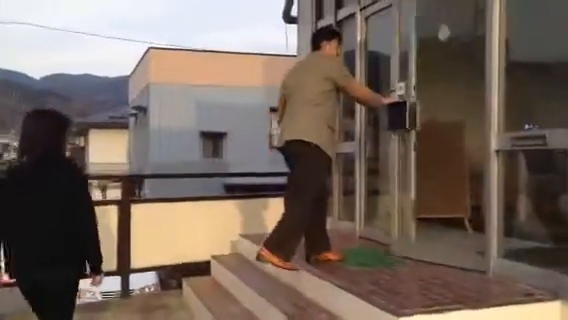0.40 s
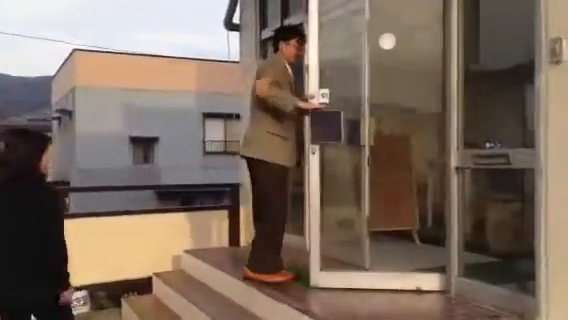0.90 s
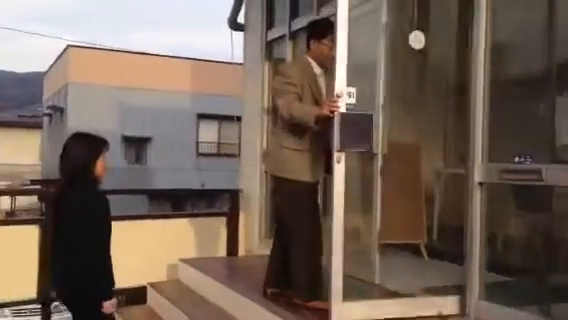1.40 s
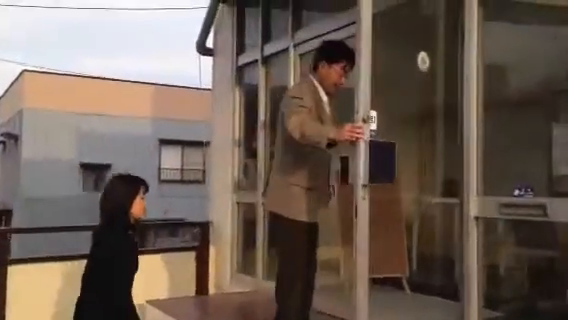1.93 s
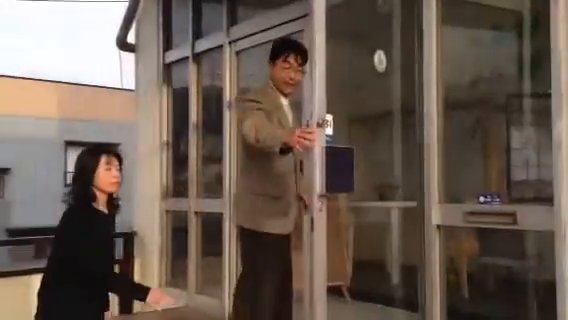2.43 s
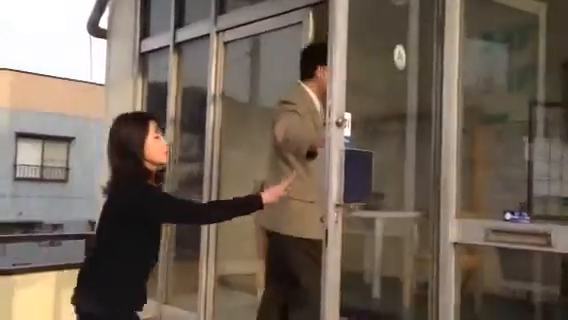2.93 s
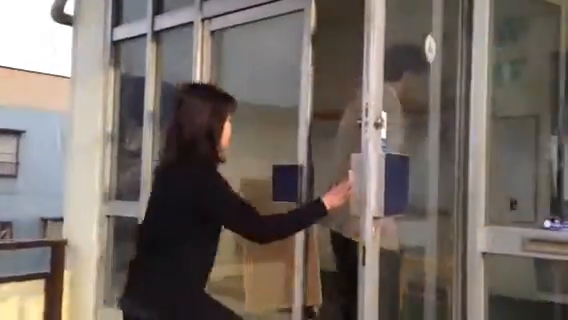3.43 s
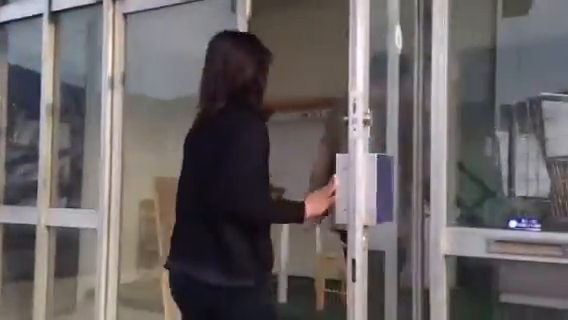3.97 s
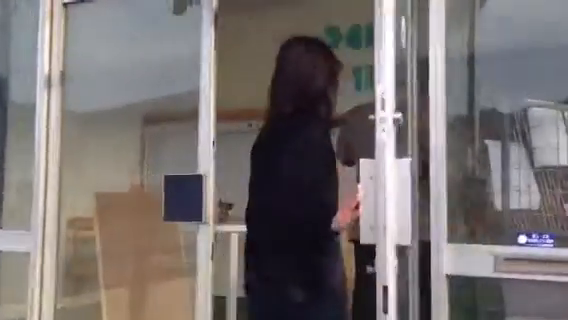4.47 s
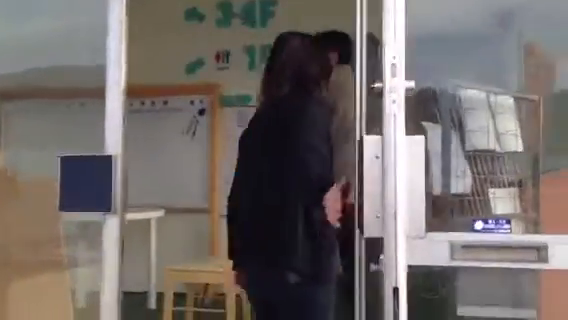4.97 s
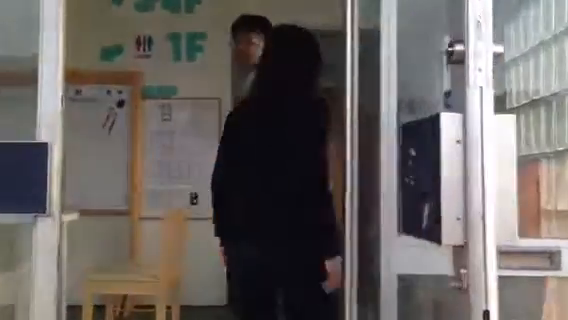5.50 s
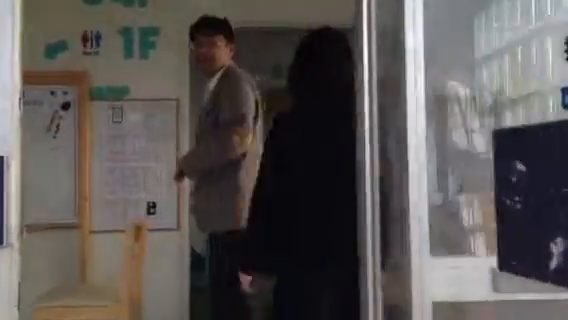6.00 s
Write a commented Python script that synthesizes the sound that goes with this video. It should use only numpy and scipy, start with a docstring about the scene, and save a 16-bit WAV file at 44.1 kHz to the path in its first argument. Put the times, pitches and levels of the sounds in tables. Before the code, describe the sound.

Mono handheld outdoor sound near a glass door: dry metallic snaps and pings of a sticking hinge, each ringing the frame with short porch echoes and a diffuse tail. Soft low wind thumps run beneath. After the door quiets, shoes scuff gently, a sole scrapes hard near the end, and small dry clicks follow, with a quiet far traffic bed throughout.

```python
"""A stiff hinge slips in sharp snaps that ring the metal frame of a glass door at an entrance porch.
Each snap is a noise crack with a gritty rattle, a pin ping and frame modes, with echoes and a diffuse tail.
Shoes step, thud and scrape (shaped noise) and small things tick (short sine swells).
Low-band noise and single thumps make the wind on the microphone, over a bed of coloured town noise."""
import sys
import numpy as np
from scipy import signal
from scipy.fft import rfft, irfft
from scipy.io import wavfile
from scipy.ndimage import uniform_filter1d

SR = 44100
rng = np.random.default_rng(int(sys.argv[2]) if len(sys.argv) > 2 else 0)


def store_pcm(level_fs):
    """Save levels as 16-bit WAV."""
    pcm = np.round(np.clip(level_fs, -1, 1) * 32767).astype(np.int16)
    wavfile.write(sys.argv[1], SR, np.atleast_2d(pcm).T)


def volts(x):
    """Linear amplitude factor 10**(x/20) for a level x in dB, scalar or array-like."""
    e = np.asarray(x, float) / 20
    return 10 ** e


N = 270112

# modes of the door frame: (pitch [Hz], level over the snap's colour [dB], t60 [s])
FRAME_MODES = [(1010, -20, .08), (1175, -10, .25), (1330, -20, .07), (1550, -17, .09), (1880, -13, .15),
               (2065, -14, .2), (2238, -15, .06), (2993, -16, .07), (3248, -16, .1), (3513, -19, .07),
               (3840, -17, .065), (4165, -18, .06), (4470, -16, .055), (4780, -19, .055), (5245, -19, .065),
               (5712, -19, .055), (6260, -20, .1), (6420, -21, .05), (7050, -20, .045), (7300, -19, .045),
               (7760, -21, .04), (8500, -21, .04), (10350, -23, .04)]


def evened(x):
    """Scales to unit rms."""
    return x / np.sqrt(np.mean(x ** 2) + 1e-20)


def read(points, hz):
    """Interpolates (Hz, value) points on a log-frequency axis."""
    f, value = np.transpose(sorted(points))
    return np.interp(np.log(hz + 1), np.log(f + 1), value)


def add(mix, start_s, sound):
    """Adds a sound in place, cut at the end of the mix."""
    part = mix[round(start_s * SR):][:len(sound)]
    part += sound[:len(part)]


def coloured(size, gain):
    """Noise whose spectrum follows gain(hz)."""
    return irfft(rfft(rng.standard_normal(size)) * gain(np.fft.rfftfreq(size, 1 / SR)), size)


def hump(hz, centre_hz, octaves):
    """A bell-shaped band on a log-frequency axis."""
    return np.exp(-0.5 * (np.log2((hz + 1) / centre_hz) / octaves) ** 2)


def town():
    """Far traffic and air: random short-time spectra with faint drifting patches."""
    # spectrum ahead of the bass cut below: (frequency [Hz], level per Hz [dB])
    spectrum = [(18, -36), (30, -19), (86, -5), (233, -18.5), (266, -3.5), (303, -9.5), (394, -11.5),
                (600, -16), (1250, -22.5), (3770, -31), (6050, -37.5), (14800, -43), (16000, -51)]
    frames, hz = N // 256 + 5, np.fft.rfftfreq(1024, 1 / SR)
    real, imag, patches = rng.standard_normal((frames, 513, 3)).T
    patches = uniform_filter1d(patches, size=14, axis=0)
    patches_db = evened(uniform_filter1d(patches, size=14, axis=1))
    bass_cut = (hz / (hz + 193.0))[:, None] ** 2
    z = (real + 1j * imag) * volts(read(spectrum, hz)[:, None] + patches_db) * bass_cut
    noise = signal.istft(z, nperseg=1024, noverlap=768)[1][:N]
    return volts(-57.5) * evened(noise)


def bump(db, hz, cycles):
    """A push and pull or two of low pressure, centred in 4096 samples."""
    turns = np.arange(-2048, 2048) / SR * hz
    swell = np.exp(-0.5 * (np.pi * turns / cycles) ** 2)
    return volts(db) * np.cos(2 * np.pi * (turns + rng.random())) * swell


def wind():
    """Lumpy pressure: two low bands shaken by the same fast eddies, and single eddies thumping the microphone."""
    # steady wind: (time [s], low-band level [dB], high-band level [dB])
    levels = [(0.0, -60, -61.5), (0.43, -67, -62.5), (1.55, -54, -59.5), (1.81, -58.5, -59),
              (2.91, -61, -58.5), (3.1, -56.5, -62), (3.54, -60.5, -62.5), (4.98, -59, -58.5),
              (5.28, -59.5, -62), (6.12, -60, -62.5)]
    # single eddies: (middle [s], envelope peak [dB], pitch [Hz], length [cycles])
    thumps = [(0.471, -48.5, 88, 2.4), (.745, -48.5, 70, 2.5), (.91, -51.5, 108, 5.1), (1.21, -47, 70, 1.9),
              (1.435, -42.5, 110, 2.5), (1.456, -40, 90, 1.6), (1.569, -41, 68.5, 2.1),
              (1.635, -39, 75, 2.1), (1.739, -33, 95, 1.7), (1.756, -34.5, 101, 1.2),
              (1.922, -34, 180, 2.3), (1.941, -40, 190, 4.3), (1.97, -40.5, 159, 3.6),
              (2.05, -42, 150, 2.9), (2.09, -46, 175, 3.2), (2.222, -37, 70, 1.1), (2.61, -47.5, 195, 3.8),
              (2.803, -37.5, 210, 1.5), (2.835, -44, 200, 3.1), (2.903, -35, 120, 1.4),
              (2.945, -38, 73.5, 2.7), (2.953, -37.5, 182, 1.15), (2.995, -40.5, 68.6, 2.1),
              (3.126, -45, 90, 1.9), (3.167, -38.5, 89.5, 1.4), (3.39, -42.5, 75, 1.3),
              (3.50, -48.5, 91, 2.9), (3.688, -44.5, 70, 1.8), (4.331, -43, 76, 1.3),
              (4.649, -44.5, 159, 2), (5.20, -51, 75, 1.8), (5.489, -44, 150, 2.7), (5.67, -51, 91, 1.9),
              (5.93, -47, 74.5, 2.1)]
    time_s, low_db, high_db = np.transpose(levels)
    t = np.arange(N) / SR
    eddies_db = 3.5 * evened(coloured(N, lambda hz: hz < 18))
    low = evened(coloured(N, lambda hz: hump(hz, 70, 0.48)))
    high = evened(coloured(N, lambda hz: hump(hz, 158, 0.62)))
    low = low * volts(np.interp(t, time_s, low_db))
    high = high * volts(np.interp(t, time_s, high_db))
    out = evened(volts(eddies_db)) * (low + high)
    for middle_s, *row in thumps:
        add(out, middle_s - 2048 / SR, bump(*row))
    return out


def tick(db, hz, cycles):
    """A few sine cycles that swell and die at once."""
    t = np.arange(1200) / SR
    u = 4 * t * hz / cycles  # swell peaks at u = 1
    return volts(db) * np.sin(2 * np.pi * hz * t) * u * np.exp(1 - u)


def ticks():
    """Small dry ticks and knocks."""
    # (time [s], peak level [dB], pitch [Hz], length [cycles])
    knocks = [(.0092, -32, 540, 7), (0.0389, -36, 890, 1.1), (.0255, -37, 3200, 5.7), (.40, -48, 965, 11),
              (.85, -41.5, 970, 3.9), (2.097, -45, 4880, 6), (3.349, -37, 7900, 9.5),
              (3.7715, -46.5, 3720, 5), (5.1495, -45.5, 4200, 5), (5.1634, -40, 3940, 5),
              (5.172, -41, 3900, 5.4), (5.1944, -53, 6500, 3.6), (5.2044, -49, 6000, 2.5),
              (5.25, -48, 7500, 4), (5.2708, -37, 2850, 2.1), (5.283, -46, 7000, 3.7),
              (5.34, -55, 5500, 3.8), (5.363, -47, 4000, 5), (5.3932, -34.5, 7100, 2),
              (5.403, -49, 8500, 6), (5.5977, -47, 4360, 4.5), (5.774, -44, 5500, 2.6),
              (5.782, -43.5, 3750, 4.4), (5.8512, -37.5, 3630, 3.2), (5.9052, -48, 5800, 4),
              (6.0247, -50, 5670, 4), (6.0771, -34.5, 5000, 2.4)]
    out = np.zeros(N)
    for start_s, *row in knocks:
        add(out, start_s, tick(*row))
    return out


def step(db, gain, rise_s, t60_s):
    """A gritty burst: noise coloured by gain(hz), made uneven by the grains under the sole."""
    t = np.arange(SR) / SR
    grit = volts(3.0 * evened(coloured(SR, lambda hz: hz < 200)))
    rise = np.minimum(t / rise_s, 1) ** 0.28
    decay = volts(-60 * np.maximum(t - rise_s, 0) / t60_s)
    return volts(db) * evened(evened(coloured(SR, gain)) * grit) * rise * decay


def thuds():
    """Hollow heel blows: noise bursts in a fairly narrow band."""
    # (time [s], level [dB], centre [Hz], t60 [s])
    blows = [(.01, -45, 785, 0.16), (.022, -40, 226, 0.16), (1.913, -45.5, 258, 0.13),
             (3.939, -48.5, 1440, 0.6)]
    out = np.zeros(N)
    for start_s, db, centre_hz, t60_s in blows:
        add(out, start_s, step(db, lambda hz: hump(hz, centre_hz, 0.57), 0.004, t60_s))
    return out


def footsteps():
    """Shoes landing and dragging: broad noise bursts, narrower in octaves when brighter."""
    # (time [s], level [dB], centre [Hz], rise [s], t60 [s])
    scuffs = [(0.0242, -45.5, 1100, .001, .11), (.339, -53, 1740, 0.0028, 0.19),
              (.471, -51, 577, 0.0014, 0.043), (1.879, -47.5, 975, 0.0066, 0.45),
              (2.06, -55, 4300, 0.021, 0.25), (2.868, -59, 6500, 0.027, .19), (3.337, -56, 880, .007, .14),
              (3.51, -64, 4000, .015, .2), (3.94, -54, 2840, .009, .9), (4.10, -64, 4460, .023, .16),
              (4.297, -63, 7540, 0.015, 0.13), (4.437, -57, 3000, .006, .23),
              (4.741, -57, 1770, 0.16, 0.18), (5.131, -61, 4200, .025, .18), (5.162, -49, 3200, .01, 0.41),
              (5.262, -56, 2630, .003, 0.6), (5.445, -50.5, 348, 0.048, .2),
              (5.46, -59.5, 3970, 0.044, 0.16), (6.068, -56, 3160, 0.047, .3)]
    out = np.zeros(N)
    for start_s, db, centre_hz, rise_s, t60_s in scuffs:
        octaves = 1.23 * (1e3 / centre_hz) ** 0.31
        add(out, start_s, step(db, lambda hz: hump(hz, centre_hz, octaves), rise_s, t60_s))
    return out


def whines():
    """Faint whines: noise bursts in very narrow bands."""
    # (time [s], level [dB], centre [Hz], width [octaves], rise [s], t60 [s])
    bands = [(.60, -60.5, 2045, 0.013, 0.11, 0.31), (3.881, -61, 3680, 0.14, .12, 0.58)]
    out = np.zeros(N)
    for start_s, db, centre_hz, octaves, rise_s, t60_s in bands:
        add(out, start_s, step(db, lambda hz: hump(hz, centre_hz, octaves), rise_s, t60_s))
    return out


def snap_colour(crack_db, treble_db, body_db, ping_hz):
    """Spectrum of a snap as (Hz, dB) points; a higher pin ping tilts the body brighter."""
    # dull body of the frame: (frequency [Hz], level over the body level [dB])
    body = [(500, -12), (1100, 0), (2000, 1.5), (2800, 2), (3300, 3.5)]
    # (frequency [Hz], level over the treble level [dB])
    bright = [(8000, 5), (10000, -1), (16000, -11)]
    tilt_db_per_octave = 4.5 * np.tanh(3 * np.log2(ping_hz / 2410))
    colour = [(hz, body_db + db + tilt_db_per_octave * np.log2(hz / 1670.0)) for hz, db in body]
    colour.append((5390, crack_db))
    return colour + [(hz, treble_db + db) for hz, db in bright]


def snap(colour, ping_hz, ping_db):
    """A short crack, the gritty rattle of the pane, the ping of the pin and the fluttering frame modes."""
    t = np.arange(8192) / SR
    noise = coloured(len(t), lambda hz: volts(read(colour, hz)))
    grit_db = 8.1 * evened(coloured(len(t), lambda hz: hz < 400))
    rattle = volts(-11 - 60 * t / 0.051 + grit_db)
    crack = noise * (volts(13.5 - 60 * t / 0.013) + rattle) * (1 - np.exp(-t / 0.00045))

    hz, db, t60_s = np.transpose(FRAME_MODES)[:, :, None]
    uneven_db = 5.5 * rng.standard_normal(hz.shape)
    turn = rng.random(hz.shape)
    flutter = rng.standard_normal((len(hz), len(t)))
    flutter = 0.8 + 0.46 * evened(uniform_filter1d(flutter, size=150, axis=1))
    decay = volts(db + read(colour, hz) + uneven_db - 60 * t / t60_s)
    modes = decay * flutter * np.sin(2 * np.pi * (hz * t + turn))

    linger = volts(-20.5 - 60 * t * ping_hz / 450)  # longer for lower pings
    ping = volts(ping_db) * (volts(-60 * t / 0.024) + linger) * np.sin(2 * np.pi * ping_hz * t)
    return crack + (modes.sum(0) + ping) * (1 - np.exp(-t / 0.00023))


def porch(x):
    """The direct sound and its early echoes off pane, floor and wall."""
    # (delay [s], level [dB])
    echoes = [(.0029, -5), (.0066, -10.5), (0.0098, -13), (0.0217, -18.5)]
    early = signal.unit_impulse(2048)
    for delay_s, db in echoes:
        add(early, delay_s, volts(np.array([db])))
    return signal.fftconvolve(x, early)[:N]


def scatter(colour):
    """Diffuse reply of the porch and the hall behind: keeps the colour of the frame modes, dies band by band."""
    # (frequency [Hz], t60 [s])
    reverb = [(300, 0.59), (1200, 0.75), (3000, 0.47), (6000, 0.18), (12000, 0.23)]
    hz, t, z = signal.stft(rng.standard_normal(16384), SR, nperseg=1024, noverlap=896)
    modes_db = 8 * hump(hz, np.transpose(FRAME_MODES)[0][:, None], 0.025).max(0)
    z *= volts((read(colour, hz) + modes_db)[:, None] - 60 * t / read(reverb, hz)[:, None])
    tail = signal.istft(z, SR, nperseg=1024, noverlap=896)[1]
    rise = np.minimum(np.arange(len(tail)) / SR / 0.016, 1)
    return volts(-11.5) * tail * rise


def door():
    """The hinge sticks and slips: each snap rings the frame and stirs the porch."""
    # (time [s], crack level [dB], treble level [dB], body level [dB], pin ping [Hz], ping level [dB])
    slips = [(.675, -54, -62, -50.5, 1900, -48), (0.6925, -47, -53, -47, 5740, -39.5),
             (0.7381, -35, -51, -45, 5800, -36), (.7822, -60, -70, -48, 1970, -45),
             (0.8082, -39, -64, -42, 3300, -32.5), (0.8894, -25.5, -39.5, -35.5, 3150, -22.5),
             (0.973, -24.5, -42, -35, 3245, -21), (1.01, -39, -53, -52, 3220, -48),
             (1.066, -27, -35.5, -38, 3160, -28), (1.1885, -26.5, -33.5, -34.5, 5930, -31),
             (1.309, -29, -37.5, -39, 5970, -26), (1.3912, -37, -48, -49, 3000, -38.5),
             (1.4883, -29, -32.5, -37.5, 3370, -30.5), (1.516, -30, -40, -38.5, 3350, -23),
             (1.5426, -39, -37.5, -42.5, 3400, -30.5), (1.5753, -34.5, -37.5, -49, 3380, -26.5),
             (1.6018, -38, -46, -51, 3340, -24.5), (1.6467, -31, -42, -44, 3420, -25.5),
             (1.6755, -45, -49, -49, 3350, -27), (1.73, -35.5, -44, -44, 3400, -31),
             (1.806, -33.5, -49.5, -46, 2260, -34.5), (1.8532, -54, -59, -52, 3310, -43),
             (1.89, -45, -50.5, -55, 1990, -39), (1.9206, -55, -60, -62, 2440, -62),
             (2.1762, -37, -46, -41.5, 5660, -29.5), (2.1951, -32, -44, -40.5, 2020, -30),
             (2.208, -27.5, -53, -42, 1940, -37), (2.2716, -29, -41.5, -43, 4260, -31),
             (2.3497, -28.5, -42.5, -41, 4270, -32), (2.5546, -24, -38.5, -32, 2110, -30.5),
             (2.614, -45, -65, -60, 3580, -55), (2.6614, -20.5, -30.5, -29.5, 2086, -25),
             (2.8016, -62, -70, -48, 1980, -66)]
    direct, diffuse = np.zeros((2, N))
    for start_s, crack_db, treble_db, body_db, ping_hz, ping_db in slips:
        colour = snap_colour(crack_db, treble_db, body_db, ping_hz)
        add(direct, start_s, snap(colour, ping_hz, ping_db))
        add(diffuse, start_s, scatter(colour))
    return porch(direct) + diffuse


def scrape():
    """One hard scrape of a sole, its hiss setting in late, and the longer, fainter, darker porch reply."""
    # (frequency [Hz], level per Hz [dB])
    spectrum = [(88, -46), (150, -20.5), (337, -0.5), (450, 1), (535, -9), (714, -9), (1270, -14.5),
                (1770, -6), (2180, -4.5), (2550, -10), (5100, -13.5), (5510, -19.5), (15000, -32)]
    level_db, rise_s = -32, 0.02

    def colour(hz):
        return volts(read(spectrum, hz))

    def darker(hz):
        return colour(hz) / (hz + 100) ** 0.39

    sound = step(level_db, colour, rise_s, 0.15)
    sound = sound + step(level_db - 19.5, darker, rise_s, 0.47)
    highpass = signal.butter(2, 6500, "high", fs=SR, output="sos")
    hiss = signal.sosfiltfilt(highpass, sound)
    t = np.arange(SR) / SR
    return sound - hiss * np.exp(-(t / 0.011) ** 2)


def scene():
    """Sums all the layers into one channel."""
    mix = town() + wind() + ticks() + thuds() + footsteps() + whines() + door()
    add(mix, 4.851, scrape())
    return mix[None]


def roll_off(x):
    """The treble ends steeply here."""
    return signal.sosfilt(signal.butter(12, 16470, fs=SR, output="sos"), x)


def record(dry):
    """The microphone cuts the deepest bass and the top treble."""
    highpass = signal.butter(2, 25, "high", fs=SR, output="sos")
    lowpass = signal.firwin(255, 16200, window=("kaiser", 9), fs=SR)
    mix = signal.sosfilt(highpass, dry)
    mix = signal.oaconvolve(mix, lowpass[None], "same")
    return roll_off(mix)


dry = scene()
out = record(dry)
store_pcm(out)
```